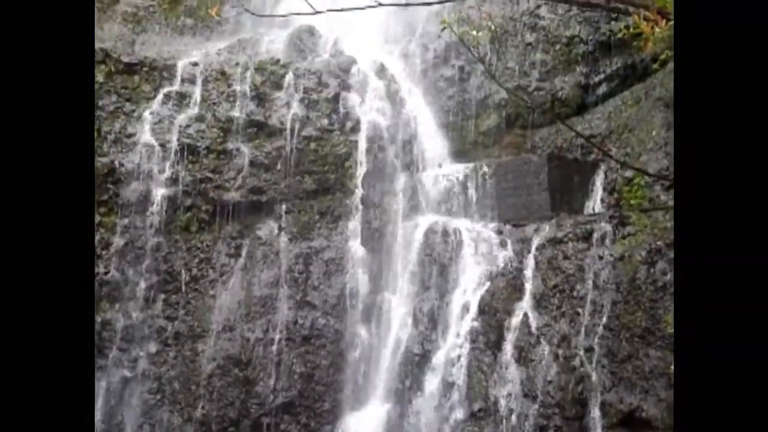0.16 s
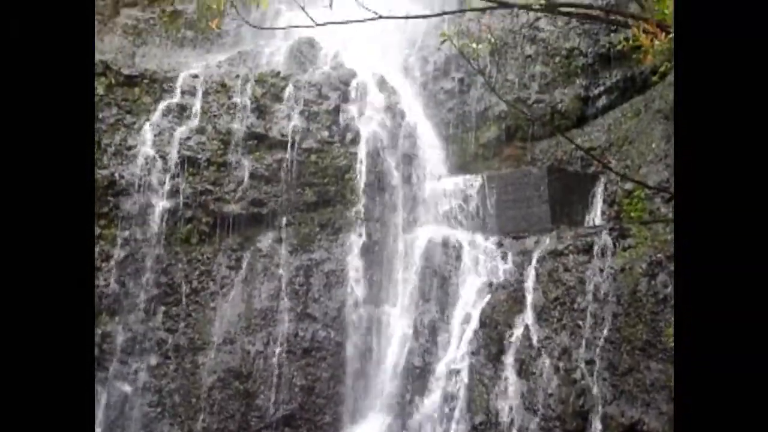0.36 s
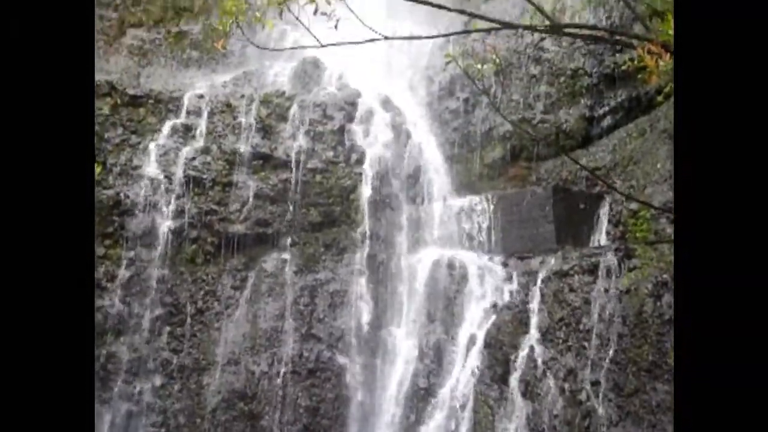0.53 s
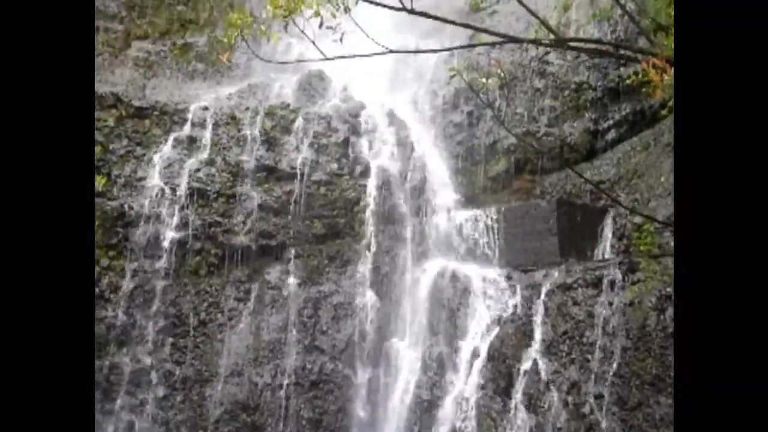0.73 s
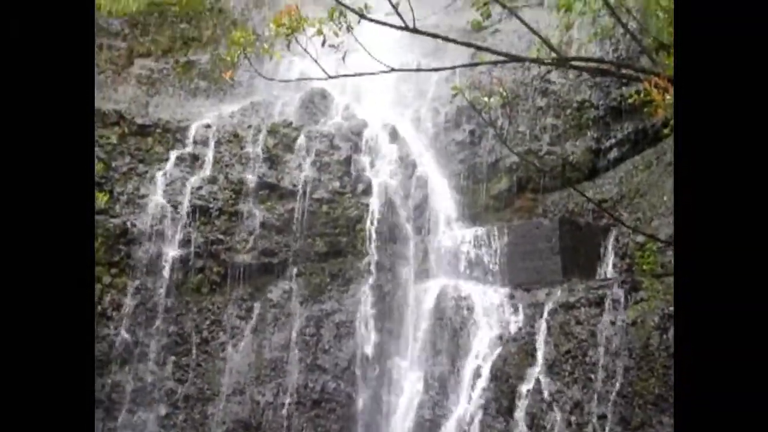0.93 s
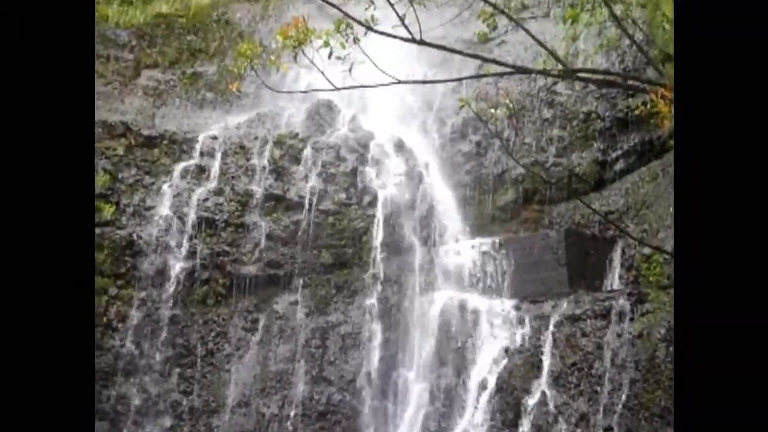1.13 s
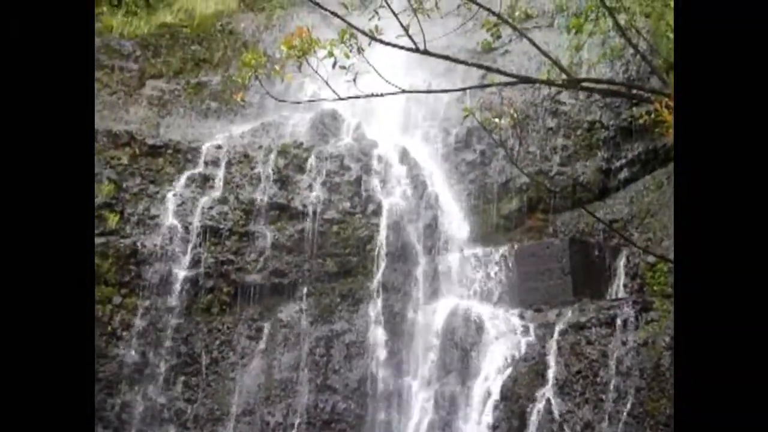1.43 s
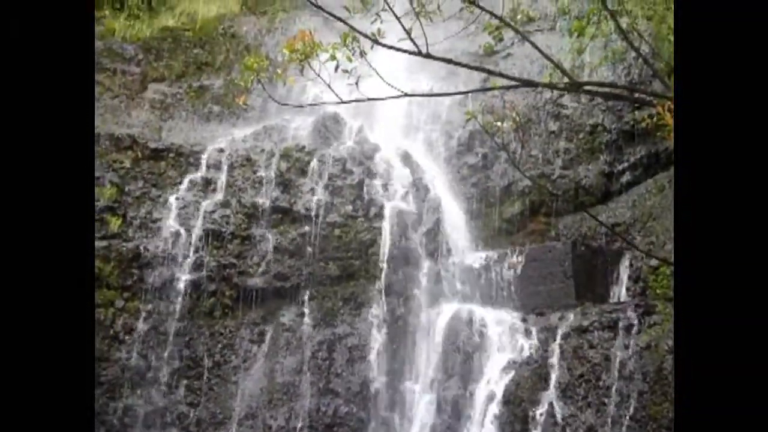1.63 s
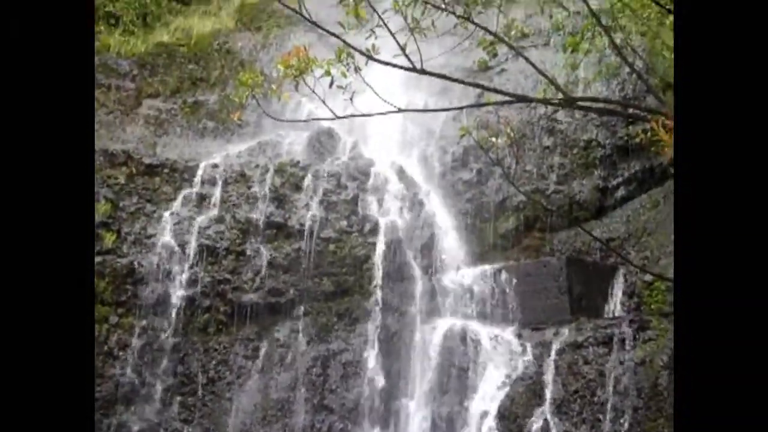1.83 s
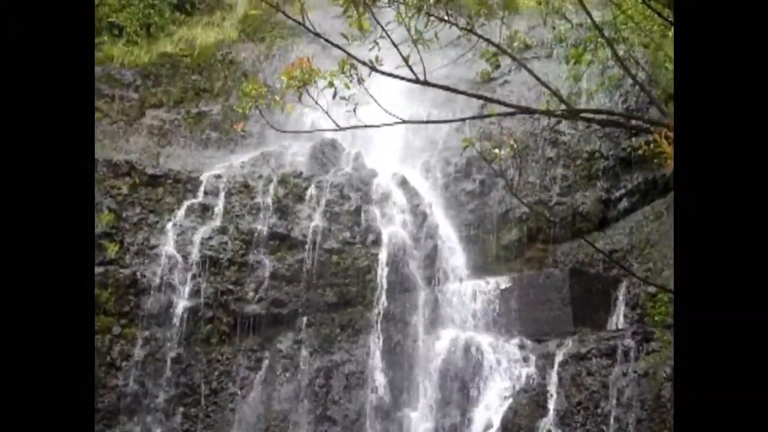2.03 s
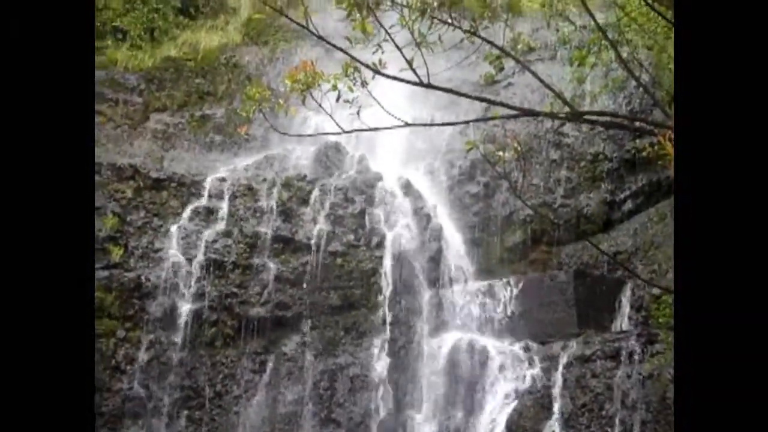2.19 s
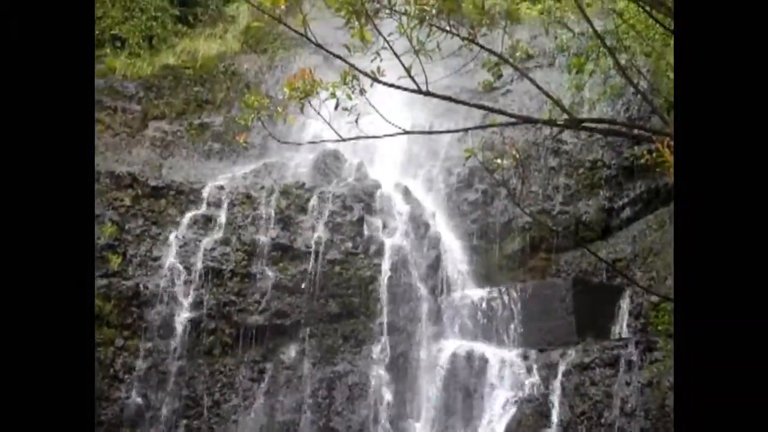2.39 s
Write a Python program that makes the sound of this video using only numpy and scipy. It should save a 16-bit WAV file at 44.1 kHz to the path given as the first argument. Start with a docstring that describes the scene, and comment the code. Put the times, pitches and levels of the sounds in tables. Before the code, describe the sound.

Steady rushing waterfall outdoors, heard from a distance in mono, smooth and almost unchanging from start to end; beneath it, irregular deep wind buffets knock the microphone, busy early, sparser midway, returning near the end.

```python
"""A smooth bright hiss is heard first: a tall waterfall on a rock face, some way off, one microphone.
The hiss is dense random drop impacts, spread in time by pitch and coloured by rock, air and distance.
Close up, gusts buffet the microphone: two noise bands make a lumpy low rumble, and single eddies,
each a short zigzag pressure swing, add distinct thumps."""
import sys
import numpy as np
from scipy import signal
from scipy.fft import rfft, irfft, next_fast_len
from scipy.io import wavfile

SR = 44100
rng = np.random.default_rng(int(sys.argv[2]) if len(sys.argv) > 2 else 0)


def master(y):
    """Save y as 16-bit WAV."""
    cut = np.clip(np.atleast_2d(y).T, -1, 1)
    pcm = np.round(cut * 32767)  # scale
    wavfile.write(sys.argv[1], SR, pcm.astype(np.int16))


N = 112454  # length in samples

# Colour of the falling water at the microphone; only the shape counts, as the hiss is levelled later.
# Columns: pitch_hz [Hz], level_db [relative dB per Hz]
WATER_COLOUR = [(60, -32), (150, -5.5), (300, -6.5), (540, -7.5), (900, -4.5), (1700, -4.5), (2200, -1.5),
                (3050, -0.5), (4300, -1), (5500, -0.5), (7600, -1.5), (10400, -2.5), (12900, -5.5),
                (14700, -12.5), (16000, -18)]

# Strength of the wind on the microphone, before the quick lumps.
# Columns: time_s [s], rumble_db [dB rms], upper_rumble_db [dB rms]
GUST_STRENGTH = [(0.0, -41, -54), (0.13, -32, -41), (0.26, -29.5, -38.5), (0.3, -32, -43), (0.4, -40, -48),
                 (0.45, -37, -48), (0.63, -37.5, -47), (0.77, -30, -41), (0.96, -39, -43), (1.11, -34, -55),
                 (1.25, -37.5, -48.5), (1.6, -35, -50), (1.76, -34.5, -55), (1.85, -33, -48),
                 (1.97, -36, -52), (2.06, -34, -53), (2.16, -32, -48), (2.29, -32.5, -48), (2.43, -35, -46),
                 (2.55, -35, -43)]

# Single eddies hitting the microphone, before the thumps are smoothed.
# Columns: crest_s [s], peak_db [dB], swing_hz [Hz], length_s [s, fade scale each side of the crest],
# direction [push 1 or pull -1]
EDDIES = [(0.096, -23.5, 82, 0.0062, 1), (0.113, -18.5, 26, 0.015, 1), (0.233, -12.5, 16, 0.011, 1),
          (0.299, -21, 41, 0.012, 1), (0.345, -22, 62, .012, 1), (0.397, -17, 31.4, 0.022, -1),
          (.628, -21.5, 49, 0.014, 1), (0.698, -19.5, 35, .013, -1), (0.744, -21.5, 71, 0.0099, 1),
          (0.792, -24, 90, 0.0074, 1), (0.816, -13.5, 31.7, 0.043, 1), (.925, -17, 23, 0.02, 1),
          (1.185, -20.5, 33, 0.014, 1), (1.343, -23.5, 18, 0.029, -1), (1.519, -18.5, 22, 0.021, 1),
          (1.911, -22.5, 38, 0.011, -1), (2.203, -13.5, 66, 0.0063, 1), (2.252, -20.5, 70, 0.0066, 1),
          (2.379, -23, 70, 0.013, 1), (2.41, -18, 20, 0.019, -1), (2.454, -26, 52, 0.0065, 1)]

WATER_DB = -25  # rms level of the hiss before its surges
DROPS_PER_S, DROP_SPREAD_DB = 40000, 1.0
SURGE_DB, SURGE_HZ = 0.36, 3.8  # rms depth and upper rate of the water's surges
SCATTER_S = 0.03  # extra delay at SR / 2, growing in proportion to pitch
RUMBLE_LOW_HZ, RUMBLE_HZ = 4, 39  # edges of the low wind band
UPPER_LOW_HZ, UPPER_HZ = 30, 85  # edges of the upper wind band
LUMP_DB, LUMP_HZ = 1.5, 9.4  # rms depth and upper rate of the wind's lumps
BUFFET_SHARP = 0.69  # how pointed the crest of a thump is
BUFFET_TOP_HZ = 260  # low-pass corner of the thumps
CUTOFF_HZ = 15330  # top of the microphone signal


def amp(db):
    """Turn dB into linear gain."""
    return 10 ** (np.asarray(db) / 20)


def rms_one(x):
    """Scale a signal to rms 1."""
    return x / np.sqrt(np.mean(x ** 2) + 1e-20)


def noise(low_hz, high_hz, order):
    """Random noise between two pitches at rms 1; one second of filter run-in is dropped."""
    low_pass = signal.butter(order, high_hz, fs=SR, output="sos")
    high_pass = signal.butter(1, low_hz, "high", fs=SR, output="sos")
    x = signal.sosfilt(low_pass, rng.standard_normal(N + SR))
    return rms_one(signal.sosfilt(high_pass, x)[SR:])


def water():
    """Dense random drop impacts of uneven size merge into hiss, coloured by rock, air and distance."""
    size = next_fast_len(N)
    hits = rng.random(size) < DROPS_PER_S / SR
    drop_gain = amp(DROP_SPREAD_DB * rng.standard_normal(size))
    drops = hits * rng.standard_normal(size) * drop_gain

    pitch_hz, level_db = np.transpose(WATER_COLOUR)
    f = np.maximum(np.arange(size // 2 + 1) * SR / size, 1)
    colour = amp(np.interp(np.log(f), np.log(pitch_hz), level_db))
    # A phase growing with f squared makes higher pitches arrive later.
    scatter = np.exp(-2j * np.pi * f * f / SR * SCATTER_S)
    hiss = irfft(rfft(drops) * scatter * colour, size)[:N]

    surge_db = SURGE_DB * noise(0.2, SURGE_HZ, order=2)
    return amp(WATER_DB + surge_db) * rms_one(hiss)


def rumble():
    """Turbulence on the microphone: two low bands swell with the gust and share quick lumps."""
    time_s, rumble_db, upper_db = np.transpose(GUST_STRENGTH)
    t = np.arange(N) / SR
    low = amp(np.interp(t, time_s, rumble_db)) * noise(RUMBLE_LOW_HZ, RUMBLE_HZ, order=2)
    upper = amp(np.interp(t, time_s, upper_db)) * noise(UPPER_LOW_HZ, UPPER_HZ, order=2)
    lumps = amp(LUMP_DB * noise(1, LUMP_HZ, order=2))
    return lumps * (low + upper)


def buffets():
    """Each eddy is a pointed, zigzag pressure swing that rises and dies around its crest."""
    t = np.arange(N) / SR
    thumps = np.zeros(N)
    for crest_s, peak_db, swing_hz, length_s, direction in EDDIES:
        away = np.abs(t - crest_s) / length_s
        envelope = np.exp(-BUFFET_SHARP * away - (away / 2) ** 2)
        # The arcsine of a cosine is a triangle wave.
        zigzag = np.arcsin(np.cos(2 * np.pi * swing_hz * (t - crest_s))) * 2 / np.pi
        thumps += np.sign(direction) * amp(peak_db) * envelope * zigzag
    # Smoothing forward and backward keeps each crest in its place.
    smoother = signal.butter(2, BUFFET_TOP_HZ, fs=SR, output="sos")
    return signal.sosfiltfilt(smoother, thumps)


def scene():
    """Distant water and wind at the microphone add up; one microphone feeds both channels."""
    mono = water() + rumble() + buffets()
    return np.array([mono, mono])


def record(dry):
    """A steep elliptic low-pass cuts the top: 0.3 dB ripple below, at least 70 dB down above."""
    top_cut = signal.ellip(12, 0.3, 70, CUTOFF_HZ, fs=SR, output="sos")
    return signal.sosfilt(top_cut, dry)


dry = scene()
out = record(dry)
master(out)
```